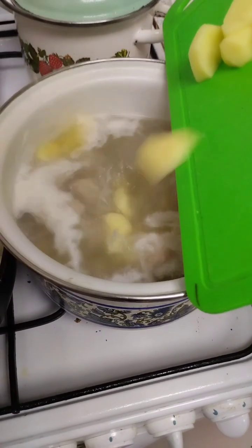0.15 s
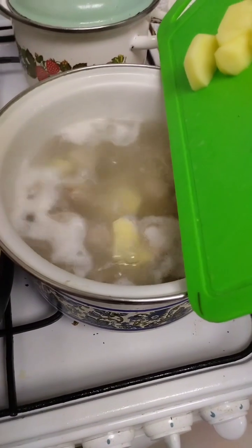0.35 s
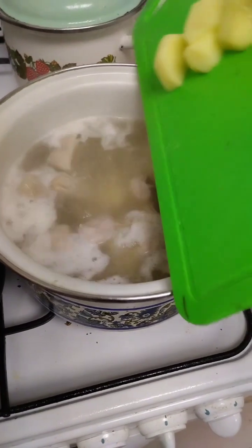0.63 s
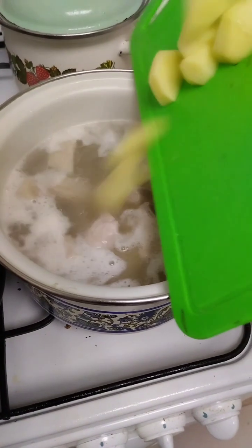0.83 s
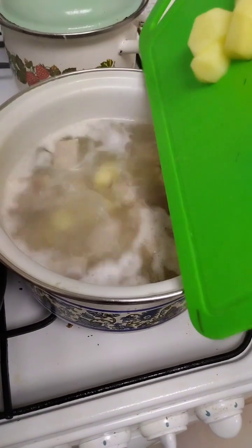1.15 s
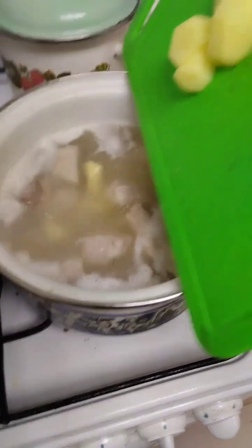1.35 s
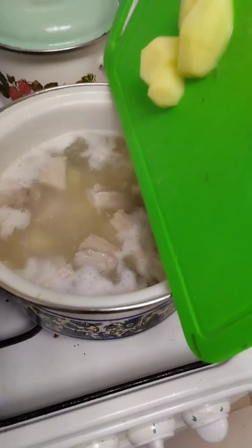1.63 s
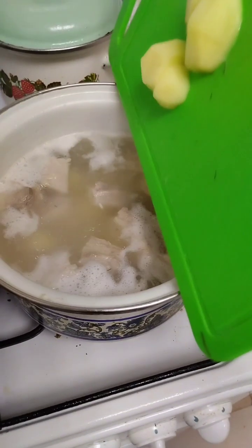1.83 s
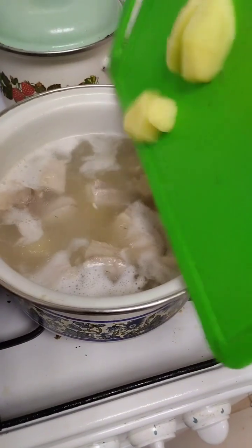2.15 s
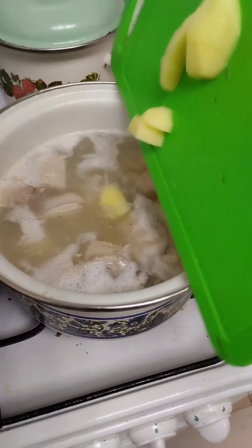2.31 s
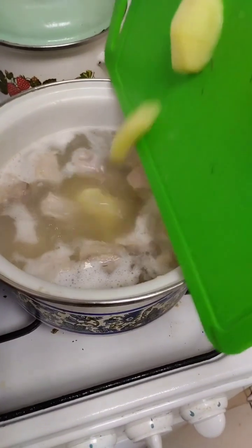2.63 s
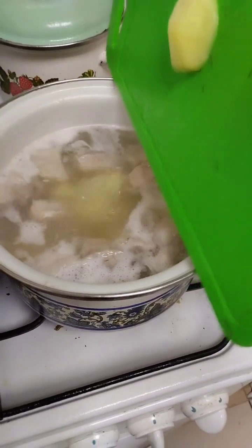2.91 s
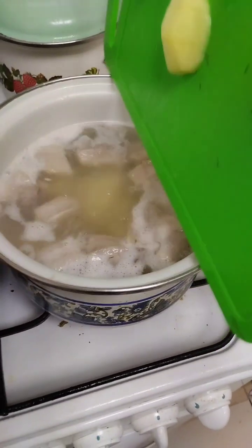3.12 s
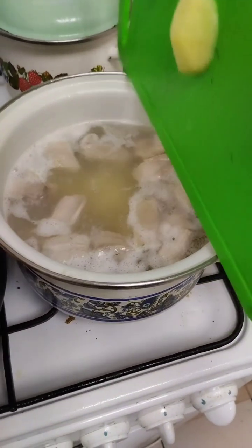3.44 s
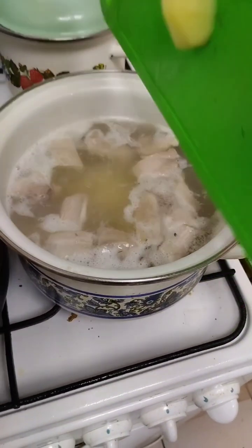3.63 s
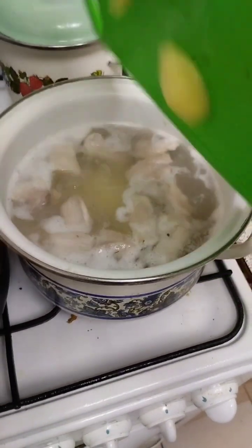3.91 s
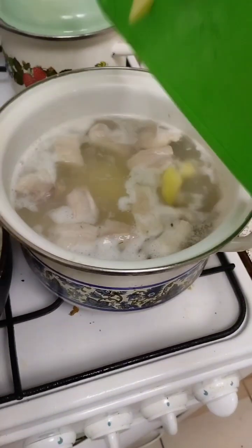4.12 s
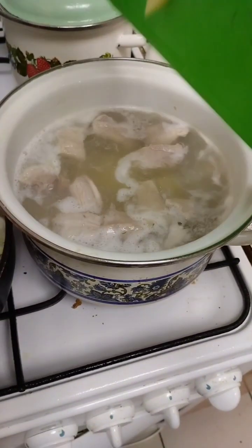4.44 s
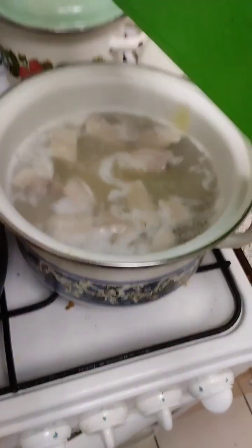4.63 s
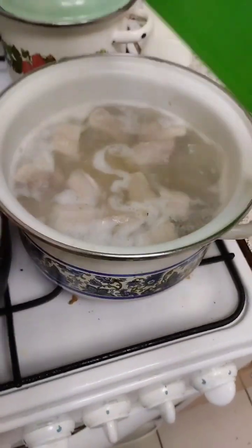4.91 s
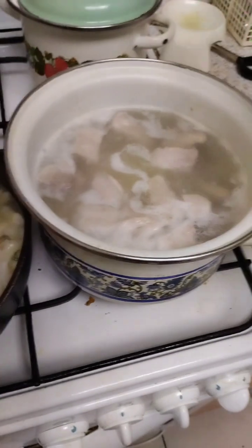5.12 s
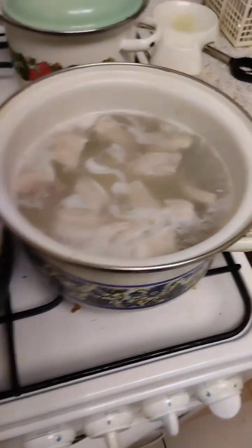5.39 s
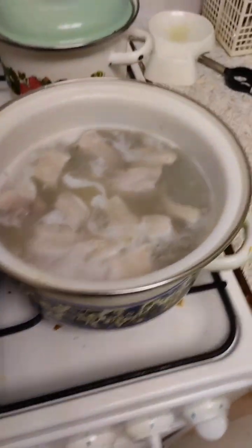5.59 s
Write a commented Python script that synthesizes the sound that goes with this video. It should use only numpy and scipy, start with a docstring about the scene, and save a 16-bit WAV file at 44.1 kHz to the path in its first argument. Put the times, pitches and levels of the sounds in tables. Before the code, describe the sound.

Close phone pickup in a small hard kitchen: a gas flame hisses and broth murmurs. Potato pieces plop in with a splash and crackling droplets, one very sharp snap just after a second. Then a plastic board taps and knocks the enamel pot rim about five times a second, the pot ringing and rocking, until only hiss, a few spits and a faint rustle remain.

```python
"""A gas burner hisses in a small hard kitchen, while potato pieces plop into broth and droplets spit and snap.
Then a plastic board is shaken against the rim of an enamel pot: most shakes tap first, then knock,
and the pot rings and rocks on its grate. It is all heard close to a phone, with a low handling rumble.
Ringing things are fading sine tones. Flames, spray, rattle and splashes are coloured noise.
The kitchen's echo is made with fading random tails."""
import sys
import numpy as np
from scipy import signal
from scipy.fft import rfft, irfft, next_fast_len
from scipy.io import wavfile
from scipy.ndimage import uniform_filter1d, map_coordinates

SR = 44100
rng = np.random.default_rng(int(sys.argv[2]) if len(sys.argv) > 2 else 0)


def dump(signal):
    """Clip the signal to [-1, 1] and save it as 16-bit WAV at the path in sys.argv[1]."""
    limited = np.clip(np.atleast_2d(signal).T, -1, 1)
    pcm = np.round(limited * 32767).astype(np.int16)
    wavfile.write(sys.argv[1], SR, pcm)


N = 253995  # length in samples


def amp(db):
    """Turn a level in dB into a gain."""
    return 10 ** (np.asarray(db) / 20)


def unit(x):
    """Scale a signal to an average strength (rms) of 1."""
    return x / np.sqrt(np.mean(x ** 2) + 1e-20)


def along(points, hz):
    """Read a curve of (Hz, value) points, with straight lines over log frequency."""
    point_hz, value = np.transpose(points)
    return np.interp(np.log(hz + 1), np.log(point_hz + 1), value)


def wobble(rate):
    """A smooth random curve through `rate` random points a second."""
    knots = rng.standard_normal(int(N * rate / SR) + 4)
    return map_coordinates(knots, [np.arange(N) * rate / SR])


def filtered(x, response):
    """Change the colour of x by a gain that depends on frequency."""
    size = next_fast_len(x.shape[-1] + 8192)  # spare room so the end does not wrap onto the start
    spectrum = rfft(x, size) * response(np.fft.rfftfreq(size, 1 / SR))
    return irfft(spectrum, size)[..., :x.shape[-1]]


def noise(spectrum, size):
    """Random noise coloured by (Hz, dB) points, with an rms of 1."""
    return unit(filtered(rng.standard_normal(size), lambda hz: amp(along(spectrum, hz))))


def patchy(spectrum, depth_db):
    """Two unrelated noises that grow and shrink together in random patches of time and pitch."""
    z = signal.stft(noise(spectrum, (2, N)), nperseg=512)[2]
    patches = rng.standard_normal(z.shape[1:])
    patches = uniform_filter1d(patches, size=4, axis=0)  # smooth over frequency
    patches = uniform_filter1d(patches, size=6, axis=1)  # smooth over time
    patched = signal.istft(z * amp(depth_db * unit(patches)), nperseg=512)[1]
    return unit(patched[:, :N])


def swell(s, db, rise, fall):
    """A gain that climbs to a peak at time s and falls again, straight in dB."""
    t = np.arange(N) / SR - s
    return amp(db - 60 * np.where(t < 0, -t / rise, t / fall))


def ringing(modes, t, scatter_db, attack, signs=(-1, 1)):
    """A struck object: fading sine tones, each with a freshly drawn strength and sign."""
    hz, db, t60 = np.transpose(modes)[..., None]
    strength = amp(db + scatter_db * rng.standard_normal(db.shape)) * rng.choice(signs, db.shape)
    tones = strength * amp(-60 * t / t60) * np.sin(2 * np.pi * hz * t)
    return tones.sum(0) * (1 - np.exp(-t / attack))


def add(track, s, sound):
    """Mix a sound into a track, starting at s seconds."""
    track[round(s * SR):][:len(sound)] += sound


def background():
    """Flame hiss in two noise bands, the murmur of the simmering pot and a low handling rumble."""
    # Levels of flame hiss, pot murmur and low handling rumble over time.
    # Each row: time in seconds, hiss, murmur and rumble levels in dB.
    levels = [(0.0, -61, -58.5, -54), (0.37, -58.5, -54, -49.5), (0.67, -61.5, -59.5, -53.5),
              (1.2, -60, -54.5, -49), (1.6, -61, -60.5, -51), (1.9, -62, -57.5, -44),
              (2.5, -60.5, -59.5, -51.5), (3.0, -61, -56, -44), (3.55, -60, -52, -50),
              (3.88, -61.5, -59.5, -54), (4.36, -59.5, -57, -48.5), (4.96, -61.5, -59, -54.5),
              (5.4, -60, -59, -53), (5.76, -62, -59, -53.5)]
    # Colours of the upper hiss, lower hiss, murmur and rumble.
    # Each row: frequency in Hz, relative level in dB per Hz.
    hiss_colour = [(3500, -50), (5700, -19), (6450, -4.5), (6900, -6), (7150, -9.5), (7500, -7),
                   (7700, 3.5), (7950, 0.5), (8500, -1.5), (9600, -6.5), (10400, -5.5), (11500, -15.5),
                   (13900, -12.5), (14600, -34)]
    low_hiss_colour = [(900, -44), (1500, -21), (1900, -5.5), (2400, -5), (3150, -14.5), (4000, -5.5),
                       (4550, -5), (4720, 1.5), (4950, -6.5), (5120, 1.5), (5300, -11.5), (5700, -13),
                       (7400, -60)]
    murmur_colour = [(65, -22), (110, -8), (151, 1.5), (172, -9), (217, -4.5), (434, -7.5), (617, -11),
                     (761, -10), (926, -13), (2500, -27), (3250, -25.5), (5500, -120)]
    rumble_colour = [(8.8, -27), (15, 10), (27, 6), (117, -14), (125, -25), (160, -29), (280, -120)]
    low_hiss_db = -3.5  # relative to the upper hiss

    s, *columns = np.transpose(levels)
    hiss_db, murmur_db, rumble_db = [np.interp(np.arange(N) / SR, s, column) for column in columns]
    high_hiss = amp(hiss_db) * patchy(hiss_colour, depth_db=3.0)
    low_hiss_level = hiss_db + low_hiss_db + 0.95 * wobble(2.41)
    low_hiss = amp(low_hiss_level) * patchy(low_hiss_colour, depth_db=2.0)
    murmur = amp(murmur_db + 1.04 * wobble(8.2)) * noise(murmur_colour, N)
    rumble = amp(rumble_db) * noise(rumble_colour, N)
    # murmur and rumble go only into the part common to left and right
    return high_hiss + low_hiss + (murmur + rumble) * [[1], [0]]


def whistles():
    """Faint tones that glide in pitch at the top of the hiss, with an unsteady level."""
    # Thin whistles. Each row: start in seconds, length in seconds, first pitch in Hz, last pitch in Hz,
    # level in dB before the flicker.
    glides = [(5.398, .085, 13080, 14280, -67), (5.49, .095, 13830, 13370, -71),
              (5.52, .09, 14130, 14170, -72), (5.61, .135, 14200, 13070, -68)]
    out = np.zeros(N + SR)
    for s, length, from_hz, to_hz, db in glides:
        hz = np.linspace(from_hz, to_hz, round(length * SR))
        tone = np.sin(2 * np.pi * np.cumsum(hz) / SR)
        add(out, s, amp(db) * signal.windows.tukey(len(hz), .4) * tone)
    return out[:N] * amp(3.0 * wobble(40))  # flicker


def kitchen(x):
    """The walls answer with fading noise: a common and a left-right part, new for every stretch of time."""
    # How long the room rings. Each row: frequency in Hz, time to fade by 60 dB in seconds.
    fade_times = [(150, 0.55), (1000, 0.35), (4000, 0.22), (12000, 0.35)]
    step, delay = SR // 8, 130  # samples
    out = np.zeros((2, N + SR))
    for start in range(0, N, step):
        hz, t, z = signal.stft(rng.standard_normal((2, SR // 3)), SR, nperseg=256)
        fade = amp(-60 * t / along(fade_times, hz)[:, None])
        tail = signal.istft(z * fade, SR, nperseg=256)[1]
        tail = tail / np.linalg.norm(tail[0])
        echo = signal.fftconvolve(x[None, start:start + step], tail, axes=1)
        out[:, start + delay:][:, :echo.shape[1]] += echo
    return out[:, :N]


def rustle():
    """Something soft brushes past nearby: a swell of noise."""
    # The brushing's swell, in order: peak time in seconds, level in dB,
    # rise and fall times over 60 dB in seconds.
    brushing = (5.43, -61, .5, .45)
    return swell(*brushing) * noise([(1200, -13), (2200, -8), (4200, -10), (6000, -22)], N)


def splash():
    """Broth thrown up and falling back: a wash of tiny drops, made of impulses of very unequal size."""
    # Swells of the wash. Each row: peak time in seconds, level in dB,
    # rise and fall times over 60 dB in seconds.
    swells = [(0.352, -45, 0.095, 0.065), (0.41, -52.5, .04, 0.28), (0.5, -67, .15, 0.23),
              (1.252, -46.5, .01, 0.29)]
    colour = [(700, -32), (1500, -4), (3500, 1.5), (6000, -2), (10000, -5), (14000, -30)]
    # sparse bigger drops stand out of a bed of small ones
    big_drops = (rng.random(N) < .04) * rng.exponential(1.3, N)
    drops = rng.standard_normal(N) * (0.32 + big_drops)
    wash = unit(filtered(drops, lambda hz: amp(along(colour, hz))))
    return sum(swell(*row) for row in swells) * wash


def plops():
    """The air pocket behind a sinking piece rings upward in pitch, in a soft slosh."""
    # Pieces entering the broth. Each row: start in seconds, level in dB, starting bubble pitch in Hz,
    # time to fade by 60 dB in seconds.
    pieces = [(0.009, -45, 386, 0.068), (0.188, -39.5, 940, 0.031), (0.194, -45, 559, 0.15),
              (0.209, -46.5, 560, 0.13), (0.253, -51, 565, 0.11), (0.34, -45, 732, 0.13),
              (1.249, -43.5, 540, 0.12), (1.662, -53, 396, 0.08), (3.0453, -26.5, 980, 0.018),
              (3.051, -40.5, 1120, 0.11), (3.416, -54, 580, 0.08)]
    out, t = np.zeros(N + SR), np.arange(SR // 4) / SR
    for s, db, hz, t60 in pieces:
        bubble = np.sin(2 * np.pi * hz * (t + 0.95 * t * t))
        slosh = 0.54 * noise([(250, -33), (550, -12.0), (1100, -13.0), (2500, -36)], len(t))
        onset = 1 - np.exp(-t / 0.00083)
        add(out, s, amp(db - 60 * t / t60) * onset * (bubble + slosh))
    return out[:N]


def spits():
    """A droplet bursts: it snaps at its own pitch, sprays briefly and leaves a short fizz."""
    # Bursting droplets. Each row: start in seconds, level in dB, pitch in Hz, spray level in dB
    # relative to the droplet.
    droplets = [(0.1103, -32, 7970, -9), (0.1363, -41.5, 4300, 1), (0.1576, -38.5, 6900, -1.5),
                (0.197, -38.5, 7770, -4), (0.322, -29, 7750, -16), (0.331, -36, 4670, 3),
                (0.341, -40, 5070, 1), (0.3466, -36, 8200, -1), (0.401, -19.5, 5180, -1.5),
                (0.412, -28, 5060, -12), (0.4797, -27, 5040, -6), (0.4922, -29, 8300, -2.5),
                (0.5322, -33, 8100, 3), (1.1354, -31.5, 8040, -7), (1.1522, -35, 8440, 1),
                (1.232, -31.5, 8300, 0), (1.2446, -5, 7720, -6), (1.29, -33, 8450, -8),
                (1.406, -36, 8100, 5.5), (2.0574, -40.5, 3560, -10), (2.396, -42.5, 4770, -3),
                (2.593, -32, 8500, -2), (2.772, -41, 8000, 2), (2.7773, -35, 5100, -2),
                (2.788, -34, 4600, -5), (2.8392, -31.5, 8500, 2.5), (4.288, -39, 9100, 2),
                (4.302, -39.5, 8200, 4), (4.3728, -37, 7900, -12), (4.3814, -25.5, 7950, -12),
                (4.382, -37, 4140, -20), (4.9219, -34, 7700, -0.5), (4.9344, -42, 7850, -12),
                (5.588, -42, 2300, -22)]
    # Colour of the spray. Each row: frequency in Hz, relative level in dB per Hz.
    spray = [(880, -36), (1500, -8), (1560, -54), (1680, -17), (3060, -3.5), (4120, 1.5), (5000, -4.5),
             (8820, -1), (14300, -10), (15000, -28)]
    fizz_db, fizz_t60_s = -13, 0.055  # level relative to the spray
    dull_ratio, dull_db, dull_per_db = 0.552, -15.5, 1.15  # a lower note, stronger in loud droplets

    out, t = np.zeros(N + SR), np.arange(SR // 4) / SR
    for s, db, hz, spray_db in droplets:
        dull_note = (dull_ratio * hz, dull_db + dull_per_db * db, .01)
        notes = [(hz, -1.5, .007), (1.13 * hz, -5, .004), (0.92 * hz, -5, .004), dull_note]
        snap = ringing(notes, t, scatter_db=2.5, attack=0.00027)
        onset = 1 - np.exp(-t / 0.00066)
        burst = amp(spray_db - 60 * t / 0.0061) * onset * noise(spray, len(t))
        fizz = amp(spray_db + fizz_db - 60 * t / fizz_t60_s) * noise(spray, len(t))
        add(out, s, amp(db) * (snap + burst + fizz))
    return out[:N]


def taps():
    """A dry tap: a low push of air, the board's bending note, the click of its edge and a short clatter."""
    # Touches of the board's edge. Each row: start in seconds, level in dB, push of air in dB
    # relative to the tap.
    touches = [(0.8162, -18, -13), (0.9777, -18, -9), (1.3695, -27, -18), (1.5752, -36, 1.5),
               (1.7742, -24, -3), (1.94, -31, 0.5), (2.111, -24, -0.5), (2.3054, -21, -2), (2.4906, -26, 3),
               (2.6964, -24.5, 0), (2.8786, -31.5, 3), (3.0722, -30.5, 5.5), (3.269, -25.5, 5),
               (3.478, -25.5, 4.5), (3.6769, -35, 4)]
    # Notes of the edge. Each row: frequency in Hz, relative level in dB,
    # time to fade by 60 dB in seconds.
    edge = [(2874, -10.5, 0.031), (3114, 2, 0.0099), (2295, -9.5, 0.014), (1370, -17, 0.022),
            (4450, -8, 0.011), (3036, -17.5, 0.01)]
    bend_db, bend_per_push = -6.5, 0.87  # the bending note follows the push
    clatter_colour = [(150, -7), (600, -4.0), (2000, -2.5), (5000, -14.5), (12000, -25)]

    out, t = np.zeros(N + SR), np.arange(SR // 6) / SR
    for s, db, push_db in touches:
        push = [(205, push_db, 0.024), (345.6, push_db - 8.0, 0.05)]
        bend = [(905, bend_db + bend_per_push * push_db, 0.035)]
        # all notes start outward
        ring = ringing(edge + push + bend, t, scatter_db=1.5, attack=.0008, signs=(1,))
        clatter = amp(-17.5 - 60 * t / 0.11) * noise(clatter_colour, len(t))
        add(out, s, amp(db) * (ring + clatter))
    return out[:N]


def knocks():
    """Every contact rings the pot, cracks, rattles board and grate and rocks the pot."""
    # Blows of the board flat on the rim. Each row: start in seconds, level in dB,
    # edge in dB (how hard the contact is), body in dB (low notes of the pot), rocking in dB,
    # ring time factor (no less than 0.2 is used).
    blows = [(0.815, -35, 4, -5.5, -12, 1), (0.978, -40, 9.5, -9, -29, 0.96),
             (1.003, -30, -4, -7.5, -17.5, 0.58), (1.207, -31, -2.5, -14.5, -44, .8),
             (1.37, -36, 2, -10, -15, 0.57), (1.408, -38.5, 1, -9, -24, 0.6),
             (1.59, -36, -12, -10, -16, 0.61), (1.8, -23, -5.5, -14.5, -36, 0.47),
             (1.979, -30, -8.5, -8.5, -19, 0.57), (2.148, -20, -0.5, -10.5, -21.5, 0.41),
             (2.326, -20, -2, -9.5, -24, 0.49), (2.519, -22, -2, -12.5, -19.5, 0.51),
             (2.708, -19.5, -14.5, -11.5, -19, 0.62), (2.9, -22.5, -3.5, -8.5, -19.5, 0.58),
             (3.084, -23.5, -6.5, -6.5, -14, 0.76), (3.282, -18, -1.5, -8.5, -14.5, 0.75),
             (3.323, -29.5, -23, -8, -12, 0.63), (3.496, -22, -1.5, -6.5, -8.5, 0.74),
             (3.539, -22, -13.5, -10.5, -15, 0.62), (3.697, -20, -6, -7, -21, 0.66),
             (4.2571, -35.5, 1, -2.5, -11.5, 0.7)]
    # Notes of the pot before each blow changes them. Each row: frequency in Hz, relative level in dB,
    # time to fade by 60 dB in seconds.
    pot = [(148.6, -9, 0.81), (188, -0.5, 0.14), (271, -10.5, 0.67), (340, -23, 0.075), (399.8, 4, 0.12),
           (431.4, -10, 0.75), (501.6, -11, 0.54), (574.4, -2, 0.4), (641, -11.5, 0.58), (776, -2.5, 0.11),
           (907, -19.5, 0.18), (978, 1.5, 0.082), (1164, -14, 0.17), (1418.5, -8.5, 0.21), (1490, -43, 0.1),
           (1920, -23, 0.54), (2223, -7, 0.084), (2290, -23, 0.54), (2640, -24.5, 0.24), (2856, -5, 0.087),
           (2793, 2, 0.062), (3220, -30, 0.025), (3395, -4.5, 0.034), (4300, -7.5, 0.049), (4970, -41, .08)]
    # Basic colour of the rattle of board and grate. Each row: frequency in Hz, relative level in dB per Hz.
    rattle_colour = [(59, -40), (100, -21), (128, -29), (194, 2), (471, -9), (580, -26), (684, -7),
                     (952, -8), (1100, -19.5), (2520, -24.5), (2730, -14.5), (3430, -26.5), (14000, -41)]
    # The full pot rocking on its grate. Each row: frequency in Hz, relative level in dB,
    # time to fade by 60 dB in seconds.
    rocking = [(67.8, 8, 0.4), (55.4, -3, 0.47), (76.2, -0.5, 0.34), (88.5, -2, 0.45)]
    rim_base_db, rim_per_edge = -5, 0.38  # high notes rise with the edge
    rattle_db = -9
    crack_colour = [(1500, 2), (3000, 1.0), (9000, 2), (14000, -31)]

    out, t = np.zeros(N + SR), np.arange(SR // 2) / SR
    hz, level, t60 = np.transpose(pot)
    onset = 1 - np.exp(-(t / 0.0013) ** 2)  # crack and rattle swell in over about a millisecond
    for s, db, edge_db, body_db, rock_db, lasting in blows:
        rim_db = rim_base_db + rim_per_edge * edge_db
        lasting = max(lasting, .2)
        # where the blow lands sets how much of the low body and the high rim it wakes
        reach = [(400, body_db + 2), (900, 0), (1700, rim_db), (2800, 6.5 + rim_db), (6000, -0.5 + edge_db)]
        # each blow rings at slightly different, randomly drawn pitches
        detuned = hz * (1 + 0.0084 * rng.standard_normal(len(hz)))
        struck = np.transpose([detuned, level + along(reach, hz), t60 * lasting])
        ring = amp(-8.5) * ringing(struck, t, scatter_db=3.0, attack=0.00015)

        crack = amp(edge_db + 5.5 - 60 * t / 0.0082) * noise(crack_colour, len(t))

        colour = [(f, d + along(reach, f)) for f, d in rattle_colour]
        chatter = np.interp(t, np.arange(250) * .002, rng.standard_normal(250))  # a new value every 2 ms
        rattle_level = rattle_db + 4.23 * chatter - 60 * t / (0.26 * lasting)
        rattle = amp(rattle_level) * noise(colour, len(t))

        rock = amp(rock_db - 3.5) * ringing(rocking, t, scatter_db=0.5, attack=0.013, signs=(1,))
        add(out, s, amp(db) * (ring + onset * (crack + rattle) + rock))
    return out[:N]


def scene():
    """Mix all sources; left and right are the sum and difference of a common and a differing part."""
    near = taps() + knocks() + spits() + plops() + splash() + rustle()
    direct = (near + whistles()) * [[1], [0]]  # only in the common part
    echo = amp([[-10], [-6]]) * kitchen(near)
    mid, side = direct + echo + background()
    return np.array([mid + side, mid - side])


def record(dry):
    """The phone is mono in bass and middle, a little wide in the treble, and cuts off the very top."""
    # What the phone keeps of the left-right difference. Each row: frequency in Hz, gain in dB.
    width = [(1000, -80), (3300, -52), (4300, -21), (6000, -9), (8000, -6), (14000, -7)]
    # Colour of the microphone. Each row: frequency in Hz, gain in dB.
    microphone = [(18, -3), (30, -15), (48, -7), (65, 0), (14200, 0), (14600, -22)]
    top_hz = 15100  # nothing passes from here up

    mid, side = (dry[0] + dry[1]) / 2, (dry[0] - dry[1]) / 2
    side = filtered(side, lambda hz: amp(along(width, hz)))
    stereo = np.array([mid + side, mid - side])
    return filtered(stereo, lambda hz: amp(along(microphone, hz)) * (hz < top_hz))


dry = scene()
out = record(dry)
dump(out)
```